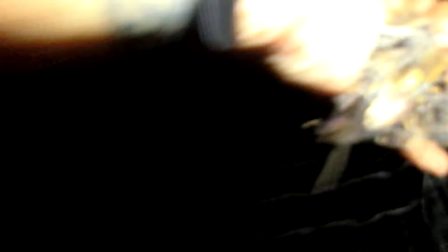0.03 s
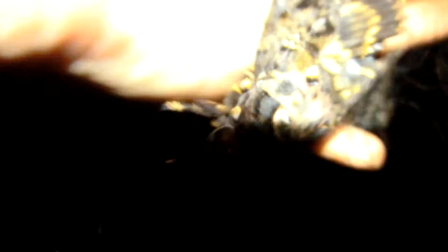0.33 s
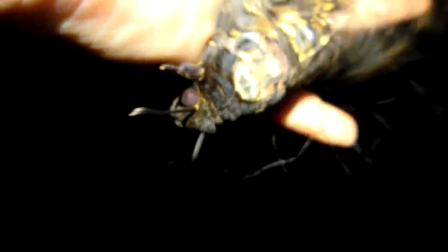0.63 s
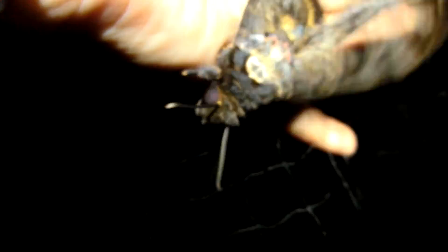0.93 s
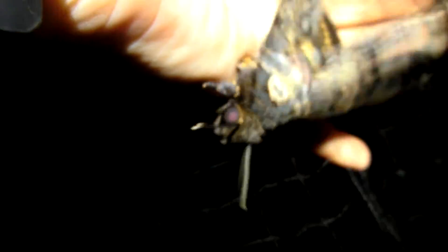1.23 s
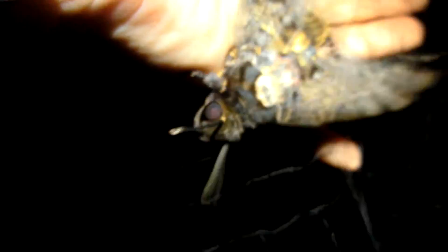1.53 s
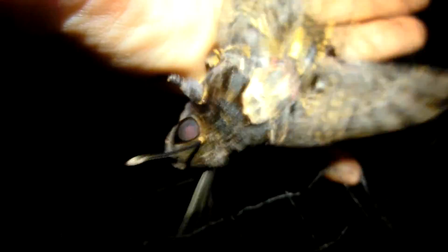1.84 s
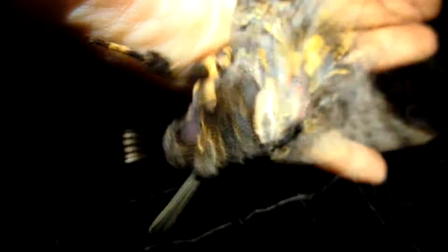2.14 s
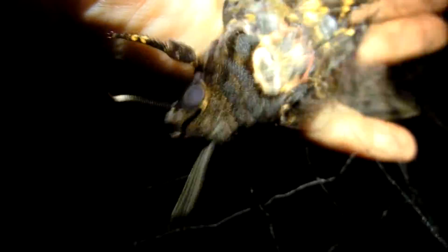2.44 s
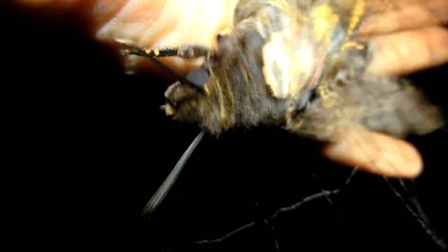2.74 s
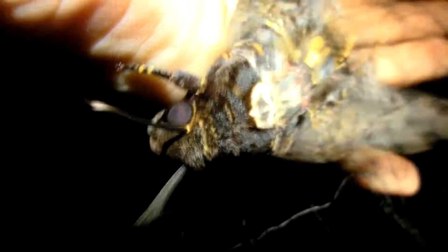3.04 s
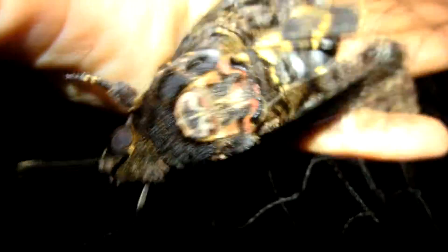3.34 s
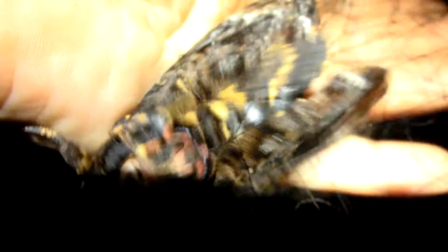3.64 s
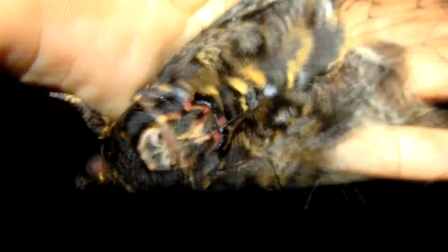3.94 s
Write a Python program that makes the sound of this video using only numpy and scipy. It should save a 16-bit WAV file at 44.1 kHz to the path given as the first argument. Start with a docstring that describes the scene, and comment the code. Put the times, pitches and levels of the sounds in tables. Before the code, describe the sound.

A moth held close to the microphone squeaks about four times a second throughout, in short, high rasps, some followed by a thin buzz, loudest around 2.5 seconds. Its wings tick dryly against the hand, with one sharp crack at 1.2 seconds and busier flicks from 2 seconds. A cricket trills behind until 1.7 seconds; faint far insects and a distant rush carry on to the end.

```python
"""Outdoors at night, a hawk moth held in a hand close to the microphone squeaks about four times a second.
Drawing air in flutters a flap in its throat (a rasp of sharp pulses); pushing it out gives a thin,
fast buzz. Its wings flick against the hand with dry ticks throughout, once with a hard crack at 1.2 s.
A cricket trills from the start and stops at 1.7 s; far insects carry on over a distant rush."""
import sys
import numpy as np
from scipy import signal
from scipy.fft import rfft, irfft
from scipy.io import wavfile

SR = 44100
rng = np.random.default_rng(int(sys.argv[2]) if len(sys.argv) > 2 else 0)


def wav_record(signal):
    """Record a signal, one row per channel, as 16-bit PCM in the file named by sys.argv[1]."""
    frames = np.transpose(np.atleast_2d(signal))
    bounded = np.clip(frames, -1, 1)
    # unit amplitude maps onto the largest positive 16-bit level
    quanta = np.round(bounded * 32767).astype(np.int16)
    wavfile.write(sys.argv[1], SR, quanta)


N = 176400

# resonances of the moth's throat: frequency_hz, gain_db
THROAT_SPECTRUM = [(500, -14.5), (4200, -15), (5200, -6), (6200, 0), (7500, -3), (8800, -5.5), (10200, -3),
                   (12000, -5.5), (15500, -14)]
OUTDOOR_DECAY_S = 0.017


def moth():
    """Close up, in the hand: throat pulses ring as rasps and duller buzzes, and the hand scatters them."""
    sharp, ringing = rasp_pulses()
    buzz = buzz_pulses()
    direct = ring(sharp, THROAT_SPECTRUM)
    direct += undb(2) * ring(ringing, resonance(centre_hz=6820, width_hz=2100))
    direct += ring(buzz, resonance(centre_hz=7150, width_hz=4400))
    return mic_pair(direct) + hand_scatter(sharp + ringing + buzz)


def rasp_pulses():
    """Air drawn in flutters the throat flap: sharp pulses slap twice; strong, slow ones ring instead."""
    # in-breaths: start_s, length_s, relative_level_db, mean_rate_hz
    rasps = [(0.236, .039, -19, 350), (0.491, 0.014, -19, 430), (0.51, 0.016, -15.5, 460),
             (.7, .014, -21.5, 290), (0.716, .013, -14.5, 480), (0.951, 0.007, -16.5, 390),
             (0.9615, 0.044, -13, 370), (1.174, .0095, -17, 420), (1.1943, .015, -14.5, 460),
             (1.399, 0.008, -16, 470), (1.42, 0.015, -15, 460), (1.639, .013, -15.5, 430),
             (1.653, 0.012, -13, 540), (1.855, 0.012, -14, 420), (1.875, 0.016, -13, 430),
             (1.8936, .030, -12, 370), (2.133, 0.011, -12.5, 470), (2.149, 0.023, -13.5, 420),
             (2.1736, 0.027, -13, 360), (2.444, 0.021, -9, 450), (2.639, 0.012, -11.5, 430),
             (2.656, 0.034, -8.5, 390), (2.836, 0.0053, -16.5, 300), (2.85, 0.018, -18.5, 260),
             (2.871, 0.011, -9, 500), (3.062, 0.022, -12.5, 510), (3.107, 0.003, -10, 360),
             (3.26, 0.024, -13, 550), (3.484, 0.028, -15.5, 460), (3.685, .049, -19.5, 420),
             (3.943, .06, -16.5, 440)]
    swell_db, swell_s = 6.5, .0035
    ring_gap_s, gap_spread_s, ring_from_db = .0028, .00039, -15
    slap_lag_s, slap_gain = .00028, .4
    soft_step = lambda x: .5 + .5 * np.tanh(x / 2)
    sharp, ringing = np.zeros((2, N))
    for start, length, db, rate in rasps:
        times, sizes = flutter(start, length, rate, slowing=.45, jitter=.11)
        sizes *= undb(10 + db - swell_db * np.exp((start - times) / swell_s))
        slow = soft_step((np.gradient(times) - ring_gap_s) / gap_spread_s)
        ring_share = slow * soft_step(db - ring_from_db)
        snap = sizes * (1 - .76 * ring_share)
        add_pulses(sharp, times, snap)
        add_pulses(sharp, times + slap_lag_s * rng.random(len(times)), -slap_gain * snap)
        add_pulses(ringing, times, sizes * ring_share)
    return sharp, ringing


def buzz_pulses():
    """Air pushed out makes a fast, nearly even run of pulses that slows and fades."""
    # out-breaths: start_s, length_s, relative_level_db, mean_rate_hz
    buzzes = [(0.279, 0.013, -28.5, 1300), (.738, .014, -24, 1150), (1.213, 0.017, -23, 1150),
              (1.437, 0.022, -20.5, 1000), (1.67, 0.024, -24, 1320), (2.884, .0056, -20.5, 1500),
              (3.087, 0.023, -23.5, 1450), (3.282, 0.025, -24, 2100)]
    fade_db = 3
    out = np.zeros(N)
    for start, length, db, rate in buzzes:
        times, sizes = flutter(start, length, rate, slowing=.285, jitter=.04)
        add_pulses(out, times, sizes * undb(10.5 + db - fade_db * (times - start) / length))
    return out


def hand_scatter(pulses, decay_s=.002):
    """The moth wriggles, so every pulse scatters differently off the hand: a short, noisy tail."""
    pole = np.exp(-2 / (decay_s * SR))
    power = signal.lfilter([(1 - pole) ** 2], np.poly([pole, pole]), pulses ** 2 + 1e-18)
    return undb(-10) * ring(np.sqrt(power) * rng.standard_normal((2, N)), THROAT_SPECTRUM)


def wingbeats(period_s=.077, soft_db=-37.5):
    """(start_s, relative_level_db) of every beat: the wings beat softly between the loud flicks."""
    # wing flicks against the hand: start_s, relative_level_db
    flicks = [(.175, -31), (.324, -30), (.402, -29), (0.555, -35), (0.804, -33.5), (1.045, -30.5),
              (1.111, -30), (1.1838, -30), (2.111, -28), (2.193, -23.5), (2.270, -29.5), (2.355, -27),
              (2.425, -25), (2.500, -28), (2.574, -26.5), (2.643, -24), (2.7152, -26), (2.791, -25),
              (2.861, -27.5), (2.933, -29.5), (3.015, -29.5), (3.167, -32), (3.245, -30.5), (3.327, -27),
              (3.428, -28), (3.516, -30), (3.610, -29), (3.714, -32), (3.806, -31), (3.897, -30)]
    beats = list(flicks)
    for (start, _), (end, _) in zip(flicks, flicks[1:]):
        count = round((end - start) / period_s)
        beats += [(start + (end - start) * k / count, soft_db) for k in range(1, count)]
    return beats


def wing_ticks():
    """Wings hit the hand: millisecond snaps with one close reflection; the last gain a lower body."""
    # resonances of a flick's snap and of its body: frequency_hz, gain_db
    snap_spectrum = [(500, -18), (1700, -9.5), (2600, -1), (5000, 0), (11000, -2.5), (13000, -4.5),
                     (16000, -15)]
    body_spectrum = [(2000, -21), (2650, 1), (3350, -8.5), (4000, -4), (6600, -21.5), (11000, -12),
                     (14000, -24)]
    # share of the body in the ticks: time_s, gain_db
    body_share = [(3.25, -26), (3.5, 2.5)]
    # treble of the snaps as the wings shift in the hand: time_s, gain_db
    treble = [(1.2, 1.5), (2.1, 1), (2.55, -3), (2.7, 5)]
    rise_s, decay_s, echo_s, spread, treble_hz = .00015, .0012, .0032, .2, 8000
    t = np.arange(SR // 60) / SR
    echo = undb(-8) * (t > echo_s) * np.exp(-abs(t - echo_s) / decay_s)
    envelope = (np.exp(-t / decay_s) + echo) * (1 - np.exp(-t / rise_s))
    snap, body = np.zeros((2, 2, N + SR))
    for start, db in wingbeats():
        mid, side = rng.standard_normal((2, len(t))) * envelope
        burst = (mid + spread * np.array([side, -side])) * undb(25 + db) / np.linalg.norm(mid)
        i = int(start * SR)
        snap[:, i:i + len(t)] += burst
        body[:, i:i + len(t)] += burst * curve(body_share)[i]
    snap = ring(snap, snap_spectrum)
    low = signal.sosfiltfilt(signal.butter(2, treble_hz, fs=SR, output="sos"), snap)
    return pan(low + (snap - low) * curve(treble) + ring(body, body_spectrum), left_db=-2)


def wing_crack(start_s=1.1852):
    """One flick lands with a single hard, bright crack."""
    impulse = np.zeros(N)
    impulse[int(start_s * SR)] = 1
    return mic_pair(ring(impulse, resonance(centre_hz=10500, width_hz=8000)))


def wing_air(puff_s=.0027):
    """Each wingbeat pushes one soft puff of air at the microphone."""
    out = np.zeros(N)
    for start, db in wingbeats():
        age = (np.arange(N) / SR - start) / puff_s
        out -= undb(db - 21) * (1 - age ** 2) * np.exp(-age ** 2 / 2)
    return out


def cricket():
    """A cricket behind the moth: each wing stroke is a short tone that falls in pitch."""
    # loudness of the trill: time_s, level_db
    levels = [(.22, -37.5), (.34, -33.5), (1.1, -30.5), (1.45, -32), (1.72, -27)]
    first_s, period_s, width_s, stop_s = .18, .026, .0054, 1.728
    pitch_hz, glide_hz, jitter_hz, jitter_db = 3729, 94, 6, 1.3
    t = np.arange(N) / SR
    stroke = np.round((t - first_s) / period_s).astype(int)
    age = t - first_s - stroke * period_s
    pitch_draw, level_draw = rng.standard_normal((256, 2))[stroke].T
    hz = pitch_hz - glide_hz * np.sin(2 * np.pi * age / period_s) + jitter_hz * pitch_draw
    strokes = np.exp(-.5 * (age / width_s) ** 2) * undb(jitter_db * level_draw)
    trill = strokes * curve(levels) * (t < stop_s) * np.sin(2 * np.pi * np.cumsum(hz) / SR)
    return outdoor_tail(trill[None], db=-11)


def insect_shimmer(swell_s=.12):
    """High, far insects swell and fade, wide across the stereo field."""
    # swells of insect hiss: peak_s, level_db
    swells = [(.6, -42), (1.1, -38.5), (1.72, -54), (2.08, -37.5), (2.52, -50), (3.3, -44), (3.88, -37)]
    t, hz = np.arange(N) / SR, np.fft.rfftfreq(N, 1 / SR)
    band = gain_at(resonance(centre_hz=10400, width_hz=2700), hz)
    envelope = sum(undb(db) * np.exp(-((t - peak) / swell_s) ** 2) for peak, db in swells)
    return envelope * np.array([noise(band), noise(band)])


def far_insects(fade_s=.067):
    """Far insects call in narrow bands of noise."""
    # calls: start_s, end_s, pitch_hz, width_hz, level_db
    calls = [(1.7, 4.1, 3480, 150, -46), (2.28, 2.66, 4275, 35, -45), (2.01, 2.15, 4590, 80, -45)]
    t, hz = np.arange(N) / SR, np.fft.rfftfreq(N, 1 / SR)
    out = np.zeros((2, N))
    for start, end, pitch, width, db in calls:
        band = 1 / (1 + (2 * (hz - pitch) / width) ** 2)
        fade = np.clip(np.minimum(t - start, end - t) / fade_s, 0, 1)
        out += undb(db) * fade * np.array([noise(band), noise(band)])
    return out


def distant_rush():
    """A distant rush, central in the midrange, wide in the deep bass and the treble."""
    # colour of the rush: frequency_hz, gain_db
    spectrum = [(25, -26), (60, -9.5), (120, -8.5), (190, -2.5), (300, -4), (540, 0.5), (880, 2),
                (1300, -3), (2200, -5.5), (4400, -5.5), (6400, -11.5), (10400, -10.5), (15500, -19)]
    # side against mid: frequency_hz, gain_db
    width = [(30, -2), (120, -17.5), (900, -21.5), (4400, -11.5), (9000, 0)]
    # loudness of the mid signal: time_s, level_db
    levels = [(.2, -38.5), (.55, -36.5), (1.6, -36), (1.9, -34), (2.85, -35), (2.97, -37), (3.6, -34),
              (4, -35.5)]
    hz = np.fft.rfftfreq(N, 1 / SR)
    colour = gain_at(spectrum, hz)
    mid = noise(colour)
    side = irfft(rfft(noise(colour)) * gain_at(width, hz), N)
    return pan((mid + np.array([side, -side])) * curve(levels), left_db=-.76)


def outdoor_tail(x, db):
    """Add a diffuse tail, different at each microphone."""
    t = np.arange(SR // 5) / SR
    response = rng.standard_normal((2, len(t))) * np.exp(-t / OUTDOOR_DECAY_S)
    response /= np.linalg.norm(response, axis=1, keepdims=True)
    return x + undb(db) * signal.fftconvolve(x, response, axes=1)[:, :N]


def mic_pair(x, lag_s=7e-6):
    """The moth's sound reaches the left microphone a little before the right."""
    phase = np.pi * np.fft.rfftfreq(N, 1 / SR) * lag_s
    return irfft(rfft(x) * np.exp(1j * np.array([phase, -phase])), N)


def flutter(start, length, rate, slowing, jitter, scatter_db=.8):
    """Times and sizes of a run of throat pulses whose gaps grow."""
    count = max(1, round(length * rate))
    gaps = np.exp(slowing * np.linspace(0, 1, count) + jitter * rng.standard_normal(count))
    age = length * np.append(0, np.cumsum(gaps)) / gaps.sum()
    return start + age, undb(scatter_db * rng.standard_normal(count + 1))


def add_pulses(out, times, sizes):
    """Place sharp pulses between samples with a windowed sinc."""
    at = times[:, None] * SR
    index = at.astype(int) + np.arange(-7, 9)
    pulses = sizes[:, None] * np.sinc(index - at) * np.sinc((index - at) / 8)
    np.add.at(out, np.clip(index, 0, N - 1), pulses)


def ring(x, spectrum, size=1024):
    """Causal resonator with the given spectrum and unit energy."""
    cepstrum = irfft(np.log(gain_at(spectrum, np.fft.rfftfreq(size, 1 / SR))))
    cepstrum[1:size // 2] *= 2
    cepstrum[size // 2 + 1:] = 0
    response = irfft(np.exp(rfft(cepstrum)))
    response /= np.linalg.norm(response)
    return signal.fftconvolve(np.atleast_2d(x), response[None], axes=1)[:, :N]


def resonance(centre_hz, width_hz):
    """(frequency_hz, gain_db) points of one steep resonance."""
    hz = np.geomspace(SR / 100, SR / 2, 100)
    detuning = (hz / centre_hz - centre_hz / hz) * centre_hz / width_hz
    return np.c_[hz, -20 * np.log10(1 + detuning ** 2)]


def noise(gain):
    """Noise of unit level with the given spectrum."""
    x = irfft(rfft(rng.standard_normal(N)) * gain, N)
    return x / x.std()


def gain_at(points, hz):
    """Gain at hz from (frequency_hz, gain_db) points."""
    frequencies, db = np.array(points, float).T
    return undb(np.interp(np.log(hz + 1), np.log(frequencies), db))


def curve(points):
    """Gain over time from (time_s, gain_db) points."""
    return undb(np.interp(np.arange(N) / SR, *np.array(points).T))


def pan(x, left_db):
    """Tip a sound left, or right if negative."""
    return x * undb(np.array([[left_db], [-left_db]]) / 2)


def undb(db):
    """Decibels to gain."""
    return 10 ** (np.asarray(db) / 20)


def scene():
    """The moth at the microphone with a faint outdoor tail, over the night behind it."""
    close = outdoor_tail(moth() + wing_ticks() + wing_crack(), db=-22)
    return close + wing_air() + cricket() + insect_shimmer() + far_insects() + distant_rush()


def record(dry):
    """The sound starts after a short silence; the top is cut."""
    start_s, top_hz = .165, 15900
    live = np.arange(N) / SR >= start_s
    return signal.sosfilt(signal.ellip(10, .2, 70, top_hz, fs=SR, output="sos"), dry * live)


dry = scene()
out = record(dry)
wav_record(out)
```